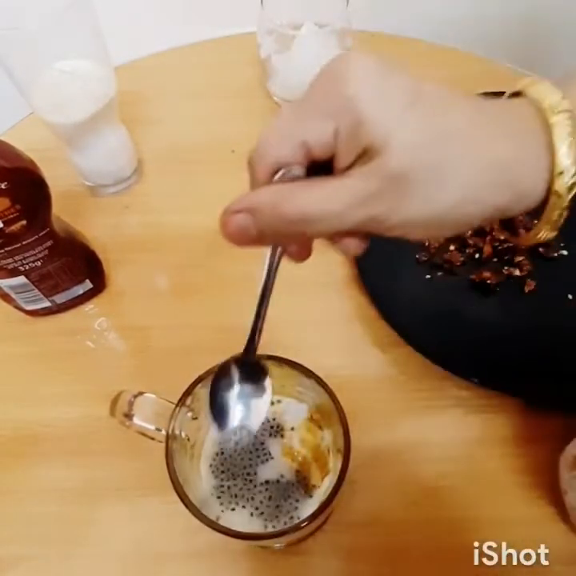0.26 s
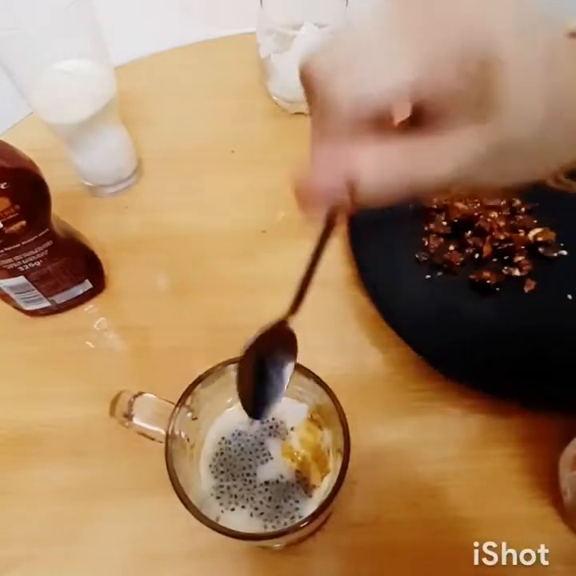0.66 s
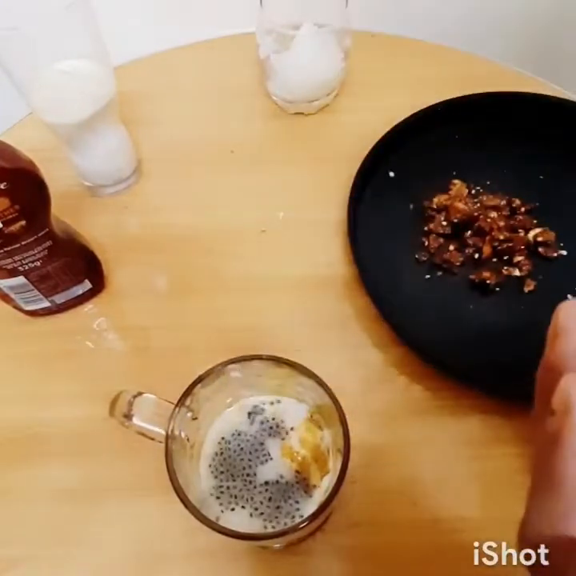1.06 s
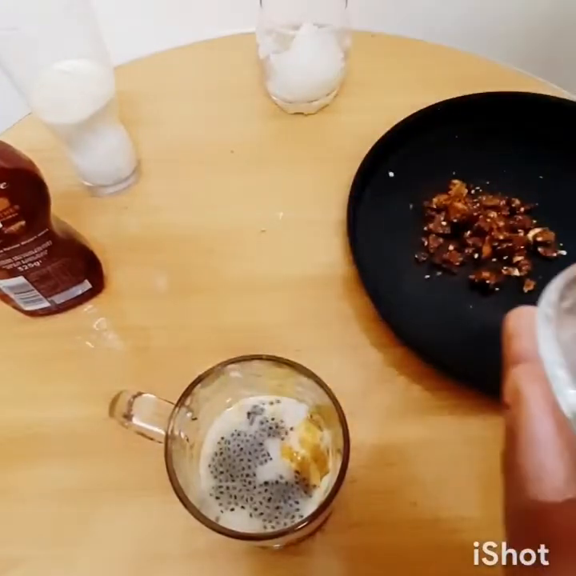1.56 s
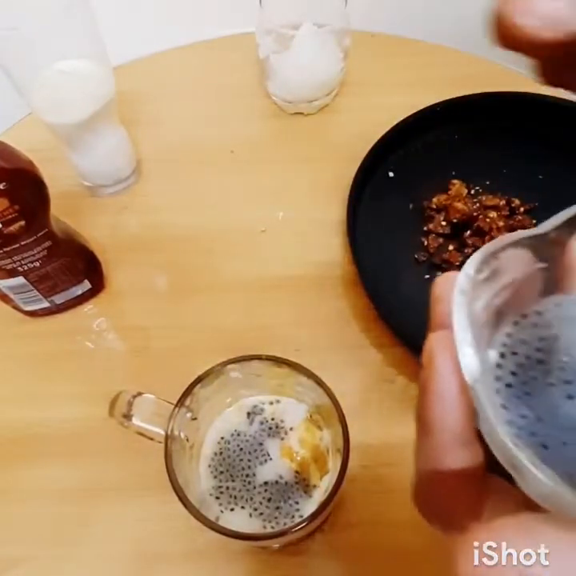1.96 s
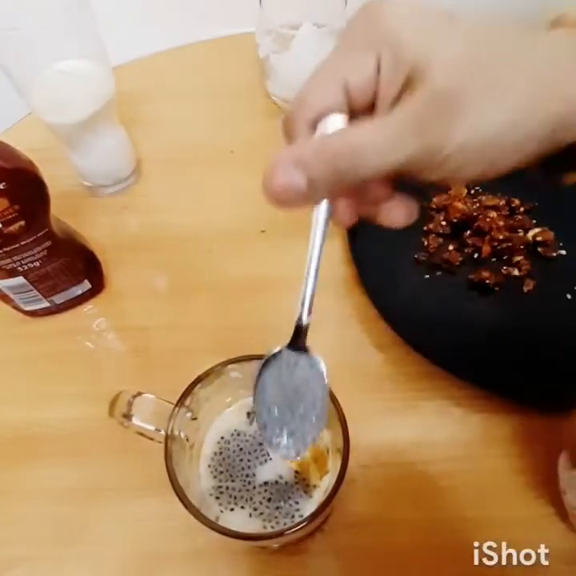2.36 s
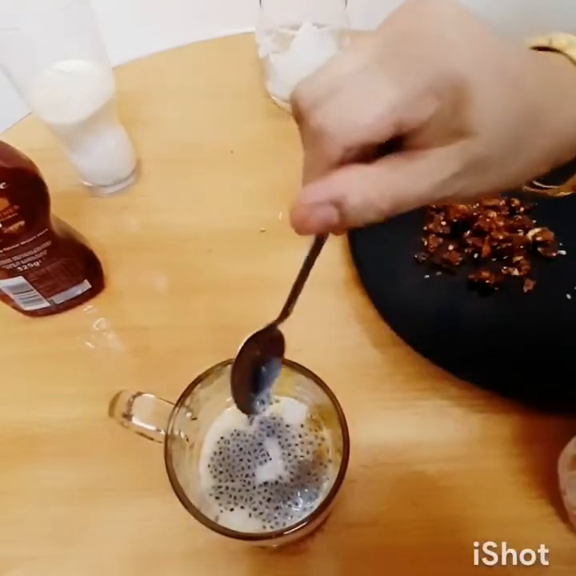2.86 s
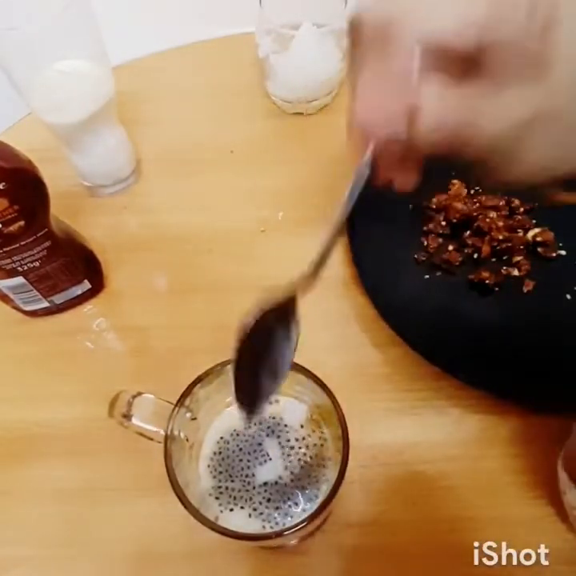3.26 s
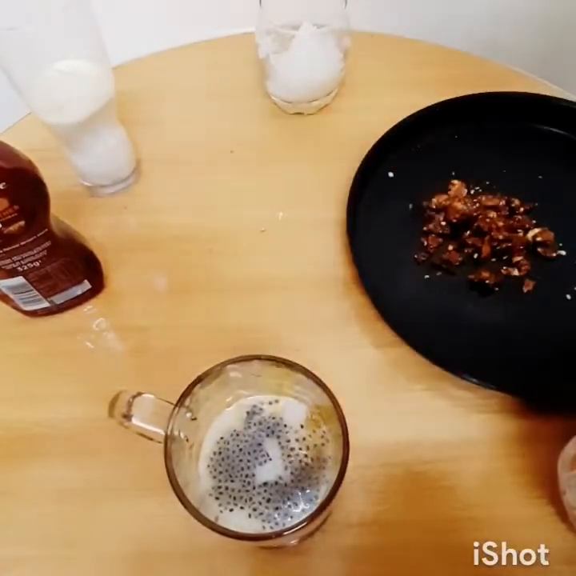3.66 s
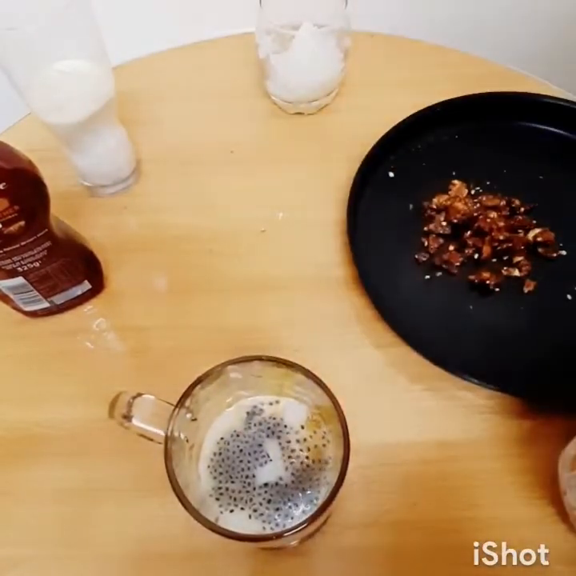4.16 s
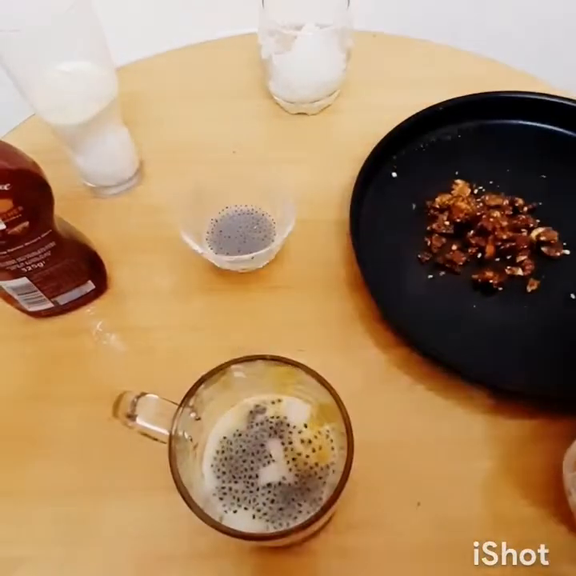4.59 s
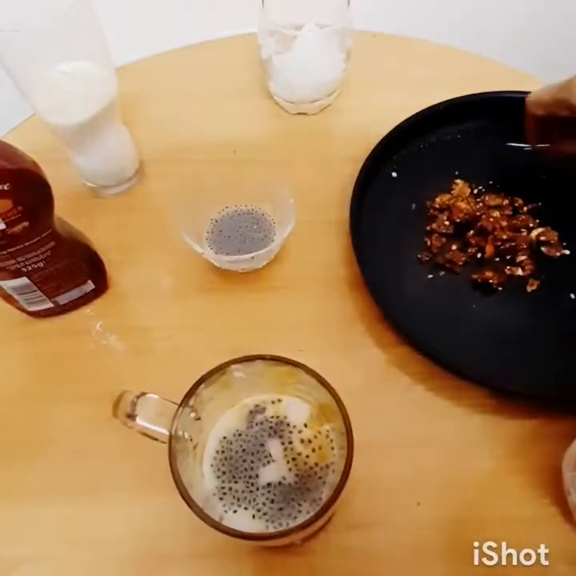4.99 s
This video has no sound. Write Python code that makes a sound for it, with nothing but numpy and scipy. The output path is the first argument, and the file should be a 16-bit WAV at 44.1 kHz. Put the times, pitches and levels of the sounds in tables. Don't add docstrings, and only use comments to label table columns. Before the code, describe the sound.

Sparse glassy spoon clinks over faint room rumble, one loud clattering spoon drop, a small bounce, and finally a container set down with a scrape.

```python
import sys
import numpy as np
from scipy import signal
from scipy.fft import irfft
from scipy.io import wavfile
from scipy.ndimage import uniform_filter1d

SR = 44100
rng = np.random.default_rng(int(sys.argv[2]) if len(sys.argv) > 2 else 0)


def int16_out(signal):
    q = np.round(np.clip(np.atleast_2d(signal).T, -1, 1) * 32767)
    wavfile.write(sys.argv[1], SR, q.astype(np.int16))


def decibels_to_gain(level_db):
    exponent = np.asarray(level_db, float) / 20
    return 10 ** exponent


N = 230775

# start in seconds, ring level in dB, crack level in dB,
# ring length as a multiple of the table's, thud level in dB.
RIM_HITS = [
    (.2955, -30.5, -41.5, 0.39, -61),
    (.3285, -39.5, -46, 0.61, -59),
]
TAP_HITS = [
    (.5025, -39.5, -48.5, 0.69, -52.5),
]
SCOOP_HITS = [
    (1.22, -41.5, -35.5, 0.061, -87),
    (2.344, -60, -61.5, 0.011, -79),
]
BOWL_HITS = [
    (1.4295, -40.5, -49.5, 1.26, -87),
    (1.4605, -33, -48.5, 0.74, -65),
]
MUG_HITS = [
    (2.9798, -29, -38, 0.74, -43),
]
DROP_HITS = [
    (3.9245, -12, -18, 0.11, -39.5),
    (3.9395, -13, -20, 0.146, -56.5),
]
BOUNCE_HITS = [
    (4.2565, -56.5, -54, 0.25, -81),
    (4.2935, -34, -41.5, 0.4, -66),
]
JAR_HITS = [
    (4.9392, -34.5, -23, 0.98, -66),
    (4.946, -38, -42, 1, -54),
]
# start in
# seconds, peak level in dB, centre in Hz, width in Hz, left-right difference in dB.
TICKS = [(0.081, -59.5, 14800, 4000, -5), (2.165, -69, 12200, 4000, -6), (2.322, -67, 14000, 3970, -20),
         (2.344, -53.5, 1300, 593, -5), (2.676, -68, 13000, 3970, -7), (4.15, -48, 1300, 1300, -2),
         (1.2205, -50, 1300, 800, -4), (3.926, -27, 1250, 903, 0), (4.223, -53, 1200, 1200, 10),
         (4.2235, -64, 4970, 8960, 2)]
# start in seconds, level in dB.
ROCKS = [
    (3.989, -46),
    (4.066, -44),
    (4.098, -36),
    (4.1304, -38),
    (4.175, -50),
]

# pitch in Hz, level in dB, time to fall by 60 dB in seconds.
RIM_MODES = [(2390, -3, .06), (4500, -8, .04), (5023, -5, .04), (6385, -6, .1), (6600, -7, .1),
             (7860, -14, .04), (9884, 0, .025), (11600, -1, .045), (12750, -10, .025), (13540, -4, .02),
             (15110, -1, .025)]
TAP_MODES = [(2382, 0, .035), (2425, -4, .03), (2300, -8, .03), (2700, -10, .03), (4450, -7, .07),
             (5405, -10, .06), (6385, -4, .09), (6600, -8, .09), (7822, -15, .04), (9870, -8, .025),
             (11600, -6, .035)]
SCOOP_MODES = [(2370, 2.5, 0.16), (4330, -10, 0.27), (5670, 1, 0.47), (6840, 2.5, 0.2), (7700, -19, 0.27),
               (8350, 3, 0.24), (9440, -2, 0.29), (12710, 0, 0.27), (14730, -13, 0.32), (15150, 3, 0.2)]
BOWL_MODES = [(1600, -12, .012), (2560, 0, .04), (2740, -2, .025), (3600, -1, .012), (5626, -4, .03),
              (7200, -9, .008), (9850, -9, .01), (12600, -14, .008), (14000, -9, .007)]
MUG_MODES = [(2382, 1, .05), (2425, -2, .04), (2300, -5, .03), (2700, -5, .035), (4450, -12, .07),
             (4662, -18, .04), (5405, -22, .04), (6385, -7, .07), (6600, -8, .09), (7822, -17, .04),
             (9410, -14, .02), (9870, -8, .02), (10340, -13, .03), (11310, -14, .025), (11600, -6, .035),
             (13540, -16, .012), (14660, -7, .012), (15070, -2, .022)]
SPOON_MODES = [(3451, -17, 0.32), (4463, -8, 0.8), (5141, -9, 0.15), (5464, -3, 0.14), (6390, -12, 0.24),
               (6778, -16, 0.28), (6896, -13, 0.28), (7020, -16, 0.32), (7278, -14, 0.26),
               (7908, -14, 0.36), (8694, -22, 0.48), (9179, -13, 0.27), (9905, -21, 0.39),
               (10130, -12, 0.19), (10770, -17, 0.26), (11560, -7, 0.19), (11690, -15, 0.28),
               (11890, -13, 0.23), (12600, 0, 0.15), (12810, -5, 0.15), (12880, -17, 0.23),
               (13150, -19, 0.24), (13310, -20, 0.25), (13750, -12, 0.24), (13900, -3, 0.14),
               (14550, -7, 0.11), (14790, -11, 0.15), (15160, -1, 0.17), (4463, -12, .4), (3340, -16, .15)]
BOUNCE_MODES = [(1900, -23, .06), (3340, -8, .09), (4463, 0, .23), (4480, -10, .15), (4595, -13, .05),
                (5001, -5, .24), (5130, -15, .1), (5380, -8, .04), (6600, -12, .03), (9030, -14, .08),
                (9810, -6, .06), (11000, -14, .06), (13180, -12, .06)]
JAR_MODES = [(650, -5, .05), (915, 1, .08), (1060, 0, .06), (1518, -2, .08), (2075, -3, .04),
             (2649, -8, .05), (2945, -6, .06), (3677, -5, .2), (4662, -10, .02), (5265, -6, .03),
             (5771, -6, .04), (6228, -4, .04), (8200, -8, .02)]
# pitch in Hz, level in dB, time to fall by 60 dB in seconds.
TABLE_MODES = [(152.3, -0.5, .15), (206, 2.5, 0.061), (297, -3.5, 0.16), (356, -8.5, 0.11),
               (427, -2.5, 0.12), (448, -3.5, 0.11), (543, -7.5, 0.14), (665, -3.5, 0.071), (837, 0, 0.019),
               (1022, -13, 0.2), (1300, -16, 0.013)]
BOARD_MODES = [(66, -5, 0.17), (103.8, 9, 0.057), (171, -3, 0.12), (508, 0, 0.034), (700, -3.5, 0.022),
               (1200, -2.5, 0.011), (1803, -1, 0.01)]
KNOCK_MODES = [(1430, -8, .006), (1850, -3, .012), (2690, -7.5, .01), (3330, 2, 0.011)]

# frequency in Hz, level in dB per Hz.
MUG_CRACK = [(350, -43), (600, -10.5), (1980, -8), (2370, -2), (3900, -10.5), (6430, -1.5), (8600, -14),
             (15000, -2), (16500, -25)]
SCOOP_CRACK = [(350, -65), (600, -61), (1220, -3), (2960, -6), (4360, 4.5), (7700, -14), (12900, 5.5),
               (15600, 0), (16500, 10)]
BOWL_CRACK = [(350, -49), (600, -24), (1750, -9), (2720, -6.5), (4610, -25), (5590, -21), (8600, -30),
              (14400, -41), (16500, -44)]
DROP_CRACK = [(180, -50), (400, -14.5), (1200, -19.5), (1900, -7), (2300, -23.5), (2900, -21.5),
              (3300, -3.5), (4460, -5), (5640, -7.5), (7900, -3), (10000, -2.5), (15200, -11.5),
              (16500, -34.5)]
BOUNCE_CRACK = [(590, -89), (1000, -65), (3270, -12), (4130, -11), (4540, 6.5), (6020, -8), (9510, -8),
                (13200, -8.5), (16500, -15)]
JAR_CRACK = [(180, -40), (300, -13), (1020, -2), (1310, -21), (2100, -5), (3410, -2.5), (8300, -6.5),
             (15200, -15.5), (16500, 0)]

# frequency in Hz, left-right difference in dB.
MUG_PAN = [(60, 22), (180, -2), (550, -2.5), (1650, -6), (4970, 1.5), (15000, -16.5)]
BOWL_PAN = [(60, -17), (180, -23), (550, -17), (1650, 2), (4970, -6.5), (15000, 0)]
SPOON_PAN = [(60, 11.5), (180, 5), (550, 5.5), (1650, -4), (4970, 3.5), (15000, -5.5)]
JAR_PAN = [(60, 10), (180, -2), (550, -6.5), (1650, -3), (4970, -2), (15000, -3)]
# frequency in Hz, likeness from 0 to 1.
CRACK_SAME = [(300, 0.89), (2000, 0.693), (6000, 0.32), (11000, .94)]

# centre in Hz, width in Hz, level in dB.
TRAY = [(662, 270, 5.5), (940, 530, 1), (1538, 350, 0.5), (2120, 310, 5), (2860, 500, 0.5), (3610, 230, -3),
        (5240, 4100, -2)]
# centre in Hz, width in Hz, level in dB, extra dB per dB of pressure.
GRIT = (9000, 9000, -19, 1.3)

# frequency in Hz, level in dB per Hz.
KITCHEN_COLOUR = [(15, -46.5), (25, -15.5), (53, -1), (192, -15), (252, -9.5), (288, -12.5), (313, -19.5),
                  (399, -19.5), (651, -23.5), (706, -26), (952, -34.5), (3910, -40), (9580, -53.5),
                  (14800, -35.5), (16500, -54)]
# frequency in Hz, likeness from 0 to 1.
KITCHEN_SAME = [(60, 0.96), (130, 1), (290, 0.53), (640, 0.54), (1410, 0.28), (3100, 0.45), (6820, 0.53),
                (15000, 1)]
# frequency in Hz, left-right difference in dB.
KITCHEN_PAN = [(60, -3.5), (150, -2), (380, -7.5), (950, -1.5), (2380, -1), (5980, -1), (15000, -3)]
# frequency in Hz, lead in radians.
KITCHEN_LEAD = [(0, 0), (780, -0.23), (2330, 11.5), (3100, 8.5), (6370, 6.5), (15800, 6.5), (16500, 7.5)]
# pitch in Hz, width in Hz, level in dB, left-right difference in dB.
HUM = [(49.88, 2.3, -63.5, -0.5), (98.1, 15, -68.5, 0), (192.5, 8, -76, -6.5), (285.6, 14, -70, -11),
       (615, 9.6, -84, 5.5), (692.6, 7.6, -79, -9.5)]

# frequency in Hz, time to fall by 60 dB in seconds.
WALL_DECAY = [(250, 0.58), (660, 0.22), (1740, 0.34), (4590, 0.3), (9000, 0.3), (14000, 0.21)]
# frequency in Hz, level in dB.
WALL_COLOUR = [(200, -1), (1000, 2.5), (2400, 1), (5000, 1), (10000, -0.5), (15000, 1.5)]


def evened(x):
    return x / np.sqrt(np.mean(x ** 2) + 1e-20)


def read(points, hz):
    f, value = np.transpose(points)
    return np.interp(np.log(hz + 1), np.log(f + 1), value)


def add(mix, s, sound):
    part = mix[:, round(s * SR):][:, :sound.shape[1]]
    part += sound[:, :part.shape[1]]


def sides(db):
    return decibels_to_gain(np.multiply.outer([.5, -.5], db))


def late(hz, lag):
    turns = max(round(abs(lag) * 4700), 1)
    return np.exp(-2j * np.pi * np.clip(np.outer([lag, 0], hz), -turns, turns))


def resonate(x, hz, width):
    turn = np.exp(2j * np.pi * hz * np.arange(x.shape[-1]) / SR)
    r = np.exp(-np.pi * width / SR)
    smooth = signal.lfilter([(1 - r) ** 2], [1, -2 * r, r * r], x / turn)
    return 2 * (turn * smooth).real


def pair(shape, same):
    a, b, c, d = rng.standard_normal((4, *shape))
    same = np.clip(same, -1, 1)
    left, other = a + 1j * b, c + 1j * d
    return np.array([left, same * left + np.sqrt(1 - same ** 2) * other])


def kitchen():
    frames, hz = N // 512 + 5, np.fft.rfftfreq(2048, 1 / SR)
    patches = rng.standard_normal((frames, len(hz))).T
    patches = uniform_filter1d(patches, size=16, axis=0)
    patches = evened(uniform_filter1d(patches, size=10, axis=1))
    z = pair((frames, len(hz)), read(KITCHEN_SAME, hz)).transpose(0, 2, 1)
    z = z * decibels_to_gain(read(KITCHEN_COLOUR, hz)[:, None] + 0.24 * patches)
    z = z * sides(read(KITCHEN_PAN, hz))[..., None]
    z[0] *= np.exp(1j * read(KITCHEN_LEAD, hz))[:, None]
    out = decibels_to_gain(-62) * evened(signal.istft(z, nperseg=2048, noverlap=1536)[1][:, :N])
    drive = pair((N,), 0.91).real
    for f, width, db, pan_db in HUM:
        out = out + decibels_to_gain(db) * sides(pan_db)[:, None] * evened(resonate(drive, f, width))
    return out


def ticks():
    out, t = np.zeros((2, N)), np.arange(600) / SR
    for s, db, hz, width, pan_db in TICKS:
        burst = evened(resonate(pair(t.shape, 0.18).real, hz, width)) * np.exp(-t / 0.0012)
        add(out, s - .0005, decibels_to_gain(db + 2) * sides(pan_db)[:, None] * burst)
    return out


def walls(x):
    first_s, length = .0135, SR // 2
    taps = np.zeros((2, length))
    at = np.arange(round(first_s * SR), length - 12, 12)
    at = at + rng.integers(0, 12, (2, len(at)))
    np.put_along_axis(taps, at, rng.choice([-1., 1.], at.shape), axis=1)
    taps[1] = .5 * taps[0] + taps[1]
    since = np.maximum(np.arange(length) / SR - first_s, 0)
    taps = taps * (1 + 0.91 * np.exp(-since / 0.0029))
    hz, t, z = signal.stft(taps, SR, nperseg=256)
    level_db = read(WALL_COLOUR, hz)[:, None] - 60 * t / read(WALL_DECAY, hz)[:, None]
    tail = signal.istft(z * decibels_to_gain(level_db), SR, nperseg=256)[1]
    return signal.fftconvolve(x, tail / np.linalg.norm(tail[0]), axes=1)[:, :N]


def crack(colour, pan, lag, tilt_db, length, rise):
    hz, t = np.fft.rfftfreq(2048, 1 / SR), np.arange(2048) / SR
    z = pair(hz.shape, read(CRACK_SAME, hz)) * sides(read(pan, hz)) * late(hz, lag)
    z = z * decibels_to_gain(read(colour, hz) + tilt_db * np.log2(hz / 4000 + 1e-2))
    return evened(irfft(z)) * (1 - np.exp(-(t / rise) ** 2)) * np.exp(-(t / length) ** 2)


def ring(modes, pan, lag, tilt_db, damping, rise):
    hz, db, t60 = np.transpose(modes)
    t = np.arange(SR // 2) / SR
    phase = np.exp(1j * np.pi * (.5 * rng.random(len(hz)) - .75)) * late(hz, lag)
    level = decibels_to_gain(db + tilt_db * np.log2(hz / 4000)) * sides(read(pan, hz))
    t60 = np.minimum(t60, 1) * abs(damping) + 0.0029
    waves = np.exp(np.outer(2j * np.pi * hz - np.log(1000) / t60, t))
    return ((level * phase) @ waves).real / np.linalg.norm(level) * (1 - np.exp(-t / rise))


def strikes(hits, modes, colour, body, pan, lag, length, rise, bright_db):
    out, usual_db = np.zeros((2, N)), np.mean(hits, axis=0)[1]
    for s, ring_db, crack_db, damping, thud_db in hits:
        tilt_db = bright_db + 0.35 * (ring_db - usual_db)
        add(out, s - .001, decibels_to_gain(ring_db + 6.5) * ring(modes, pan, lag, tilt_db, damping, rise))
        add(out, s - .001 - rise, decibels_to_gain(crack_db) * crack(colour, pan, lag, tilt_db, length, rise))
        add(out, s - .001, decibels_to_gain(thud_db + 11.0) * ring(body, pan, lag, 0, 1, rise=0.001))
    return out


def rim_clinks():
    return strikes(RIM_HITS, RIM_MODES, MUG_CRACK, TABLE_MODES, MUG_PAN,
                   lag=0.000413, length=0.011, rise=0.00067, bright_db=-0.6)


def mug_tap():
    return strikes(TAP_HITS, TAP_MODES, MUG_CRACK, TABLE_MODES, MUG_PAN,
                   lag=0.000385, length=0.0095, rise=0.001273, bright_db=-3.5)


def scoops():
    return strikes(SCOOP_HITS, SCOOP_MODES, SCOOP_CRACK, TABLE_MODES, BOWL_PAN,
                   lag=-0.00011, length=0.0079, rise=0.00037, bright_db=-2.5)


def bowl_clinks():
    return strikes(BOWL_HITS, BOWL_MODES, BOWL_CRACK, TABLE_MODES, BOWL_PAN,
                   lag=-0.000091, length=0.0089, rise=0.00048, bright_db=2.0)


def mug_clink():
    return strikes(MUG_HITS, MUG_MODES, MUG_CRACK, TABLE_MODES, MUG_PAN,
                   lag=0.000395, length=0.013, rise=0.00088, bright_db=0.1)


def spoon_drop():
    return strikes(DROP_HITS, SPOON_MODES, DROP_CRACK, BOARD_MODES, SPOON_PAN,
                   lag=.00021, length=0.013, rise=0.0031, bright_db=3.0)


def rattle():
    start_s, length_s, lag = 3.951, .289, .00021
    start_db, loss_db_per_s, rock_s, dip_db = -37.5, 93.5, 0.28, 3
    t, out = np.arange(0, length_s, 1 / SR), np.zeros((2, N))
    force_db = start_db - loss_db_per_s * t - dip_db * np.sin(np.pi * (t - .04) / rock_s) ** 2
    contacts = (rng.random(len(t)) < 3000 / SR) * rng.standard_normal(len(t))
    contacts = evened(contacts) * decibels_to_gain(force_db)
    for s, db in ROCKS:
        contacts[min(round((s - start_s) * SR), len(t) - 1)] += decibels_to_gain(db + 12.5)
    touch = ring(SPOON_MODES, SPOON_PAN, lag, -2.5, 0.035, 0.00041)[:, :2048]
    touch = touch + 0.093 * crack(DROP_CRACK, SPOON_PAN, lag, 0, 0.009, 0.00018)
    touch = touch + 0.18 * ring(KNOCK_MODES, SPOON_PAN, lag, 0, 0.89, 0.0003)[:, :2048]
    add(out, start_s, signal.fftconvolve(contacts[None], touch / np.linalg.norm(touch[0]), axes=1))
    return out


def spoon_bounce():
    return strikes(BOUNCE_HITS, BOUNCE_MODES, BOUNCE_CRACK, BOARD_MODES, SPOON_PAN,
                   lag=.00021, length=0.006, rise=0.000874, bright_db=-3.0)


def jar_slide():
    land_s, scrape_s, scrape_db, ease_db_per_s = 4.938, 0.08, -48, 153.5
    t, out = np.arange(0, N / SR - land_s, 1 / SR), np.zeros((2, N))
    slips = pair(t.shape, 0.52).real * decibels_to_gain(2.4 * rng.exponential(1, len(t)))
    tray = evened(sum(decibels_to_gain(db) * evened(resonate(slips, f, w)) for f, w, db in TRAY))
    press_db = scrape_db - ease_db_per_s * np.maximum(t - scrape_s, 0)
    hz, width, grit_db, growth = GRIT
    grit = decibels_to_gain(grit_db + growth * (press_db + 54.5)) * evened(resonate(slips, hz, width))
    add(out, land_s, (tray + grit) * decibels_to_gain(press_db) * np.minimum(t / 0.0022, 1))
    return out


def jar_landing():
    return strikes(JAR_HITS, JAR_MODES, JAR_CRACK, TABLE_MODES, JAR_PAN,
                   lag=-.0002, length=.005, rise=.001, bright_db=0)


def scene():
    sources = [(rim_clinks(), -7.5), (mug_tap(), -5.5), (scoops() + ticks(), -6.5), (bowl_clinks(), -11.5),
               (mug_clink(), -6), (spoon_drop() + rattle(), -7.5), (spoon_bounce(), -3), (jar_landing(), -2)]
    close = sum(sound for sound, db in sources)
    sent = sum(decibels_to_gain(db) * sound for sound, db in sources)
    return close + walls(sent) + jar_slide() + kitchen()


def low_pass(x):
    return signal.sosfilt(signal.butter(12, 16950, fs=SR, output="sos"), x)


def record(dry):
    bass_cut = signal.butter(N=4, Wn=40, btype="high", fs=SR, output="sos")
    thinned = signal.sosfilt(bass_cut, dry)
    treble_cut = signal.firwin(255, 15900, window=("kaiser", 5), fs=SR)
    limited = signal.oaconvolve(thinned, treble_cut[None], "same")
    return low_pass(limited)


dry = scene()
out = record(dry)
int16_out(out)
```